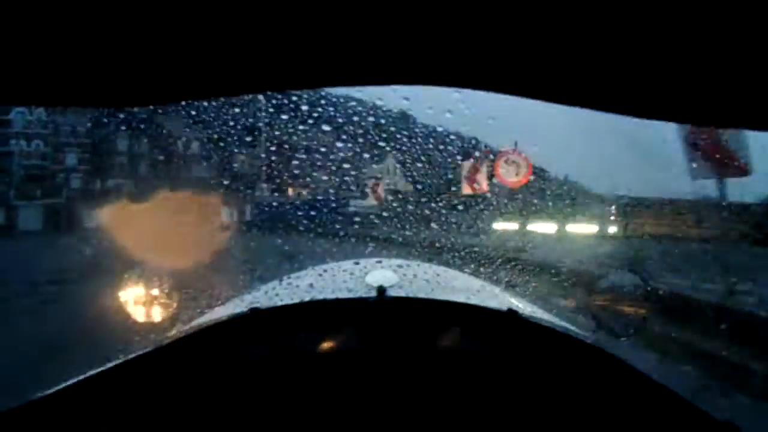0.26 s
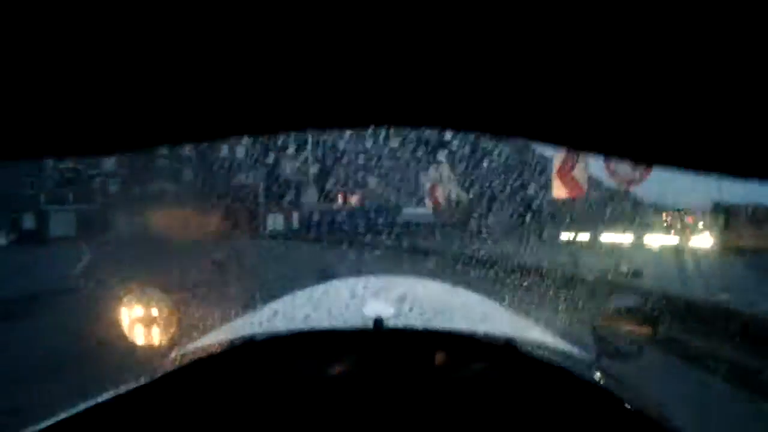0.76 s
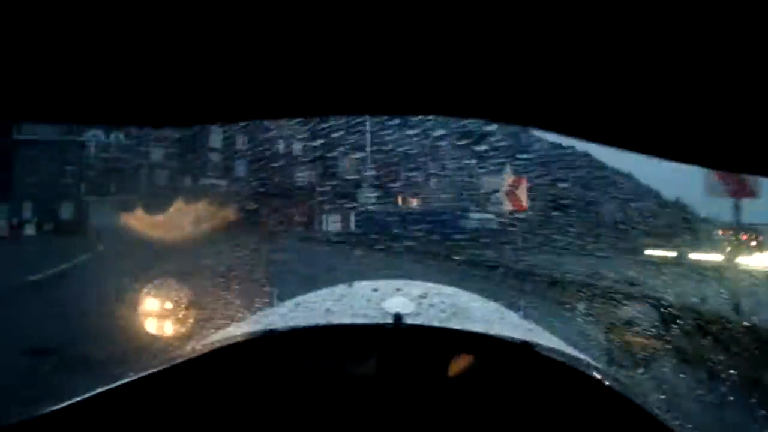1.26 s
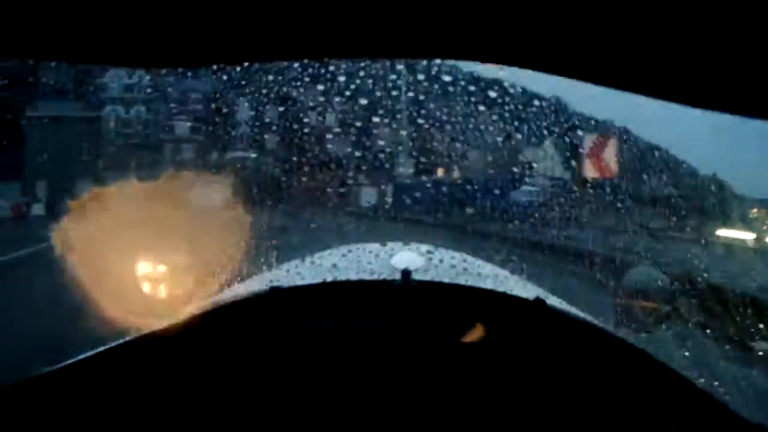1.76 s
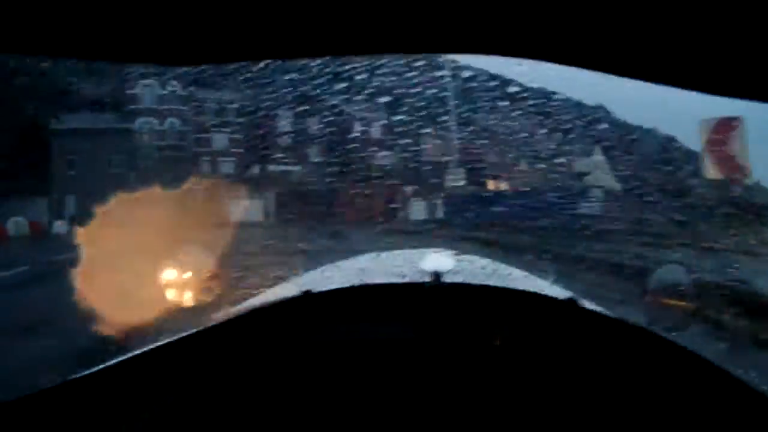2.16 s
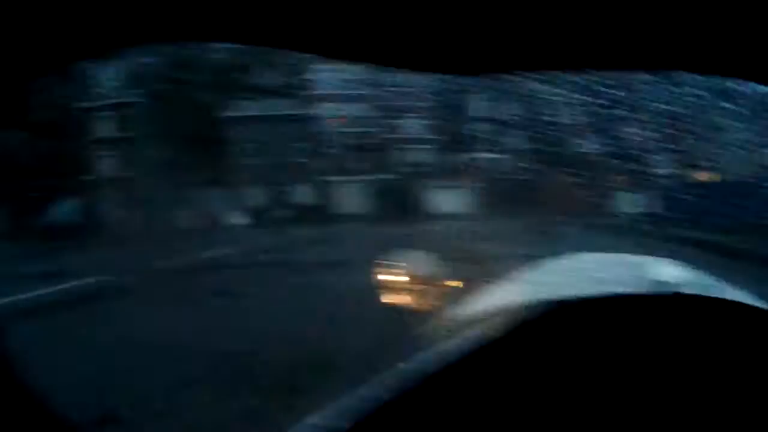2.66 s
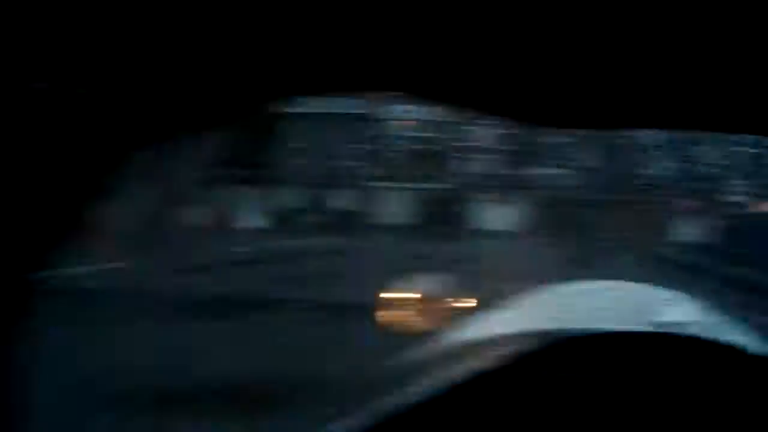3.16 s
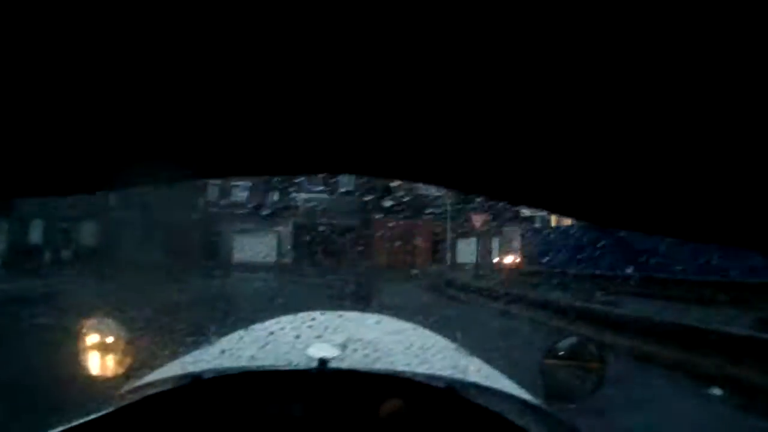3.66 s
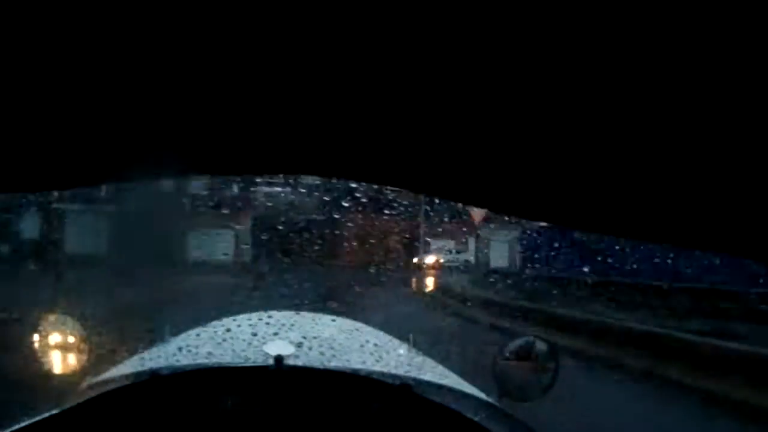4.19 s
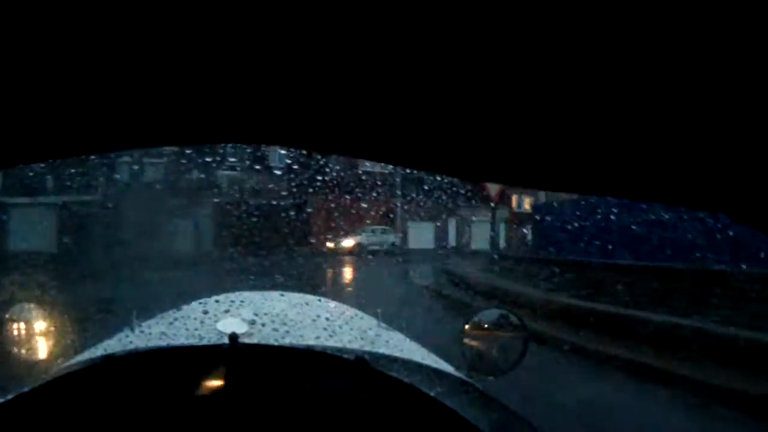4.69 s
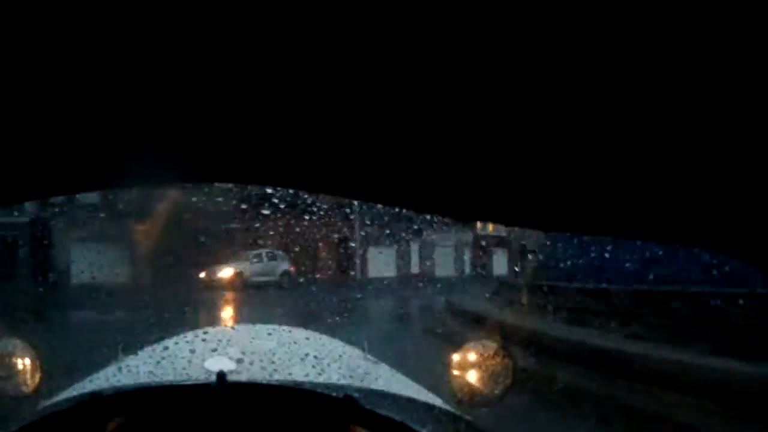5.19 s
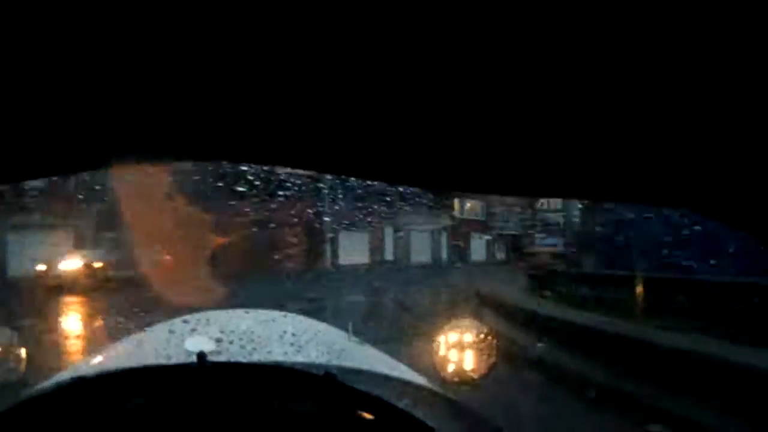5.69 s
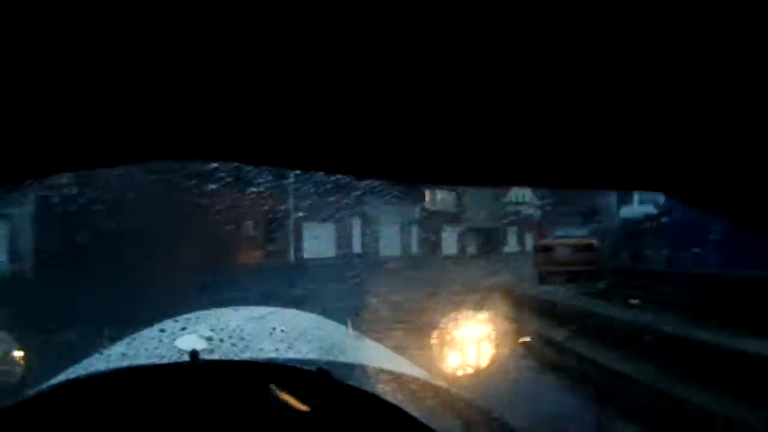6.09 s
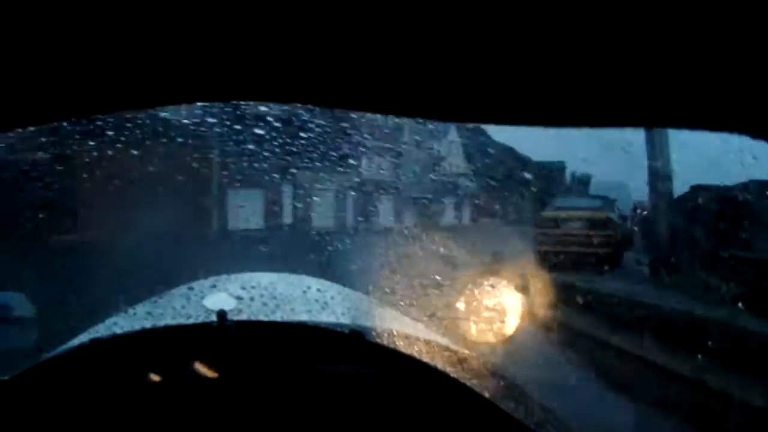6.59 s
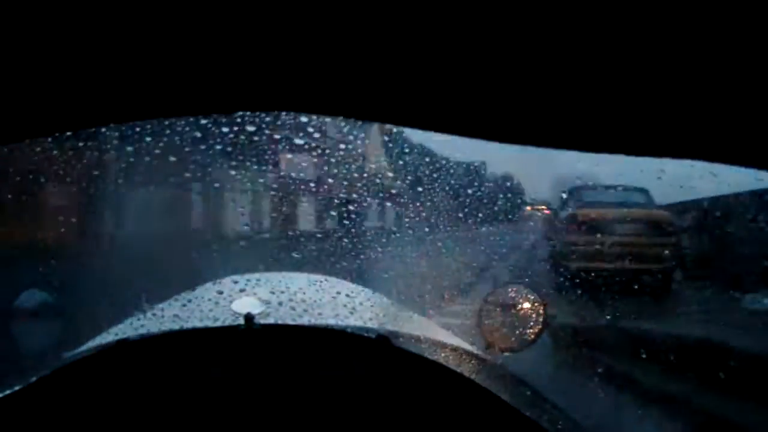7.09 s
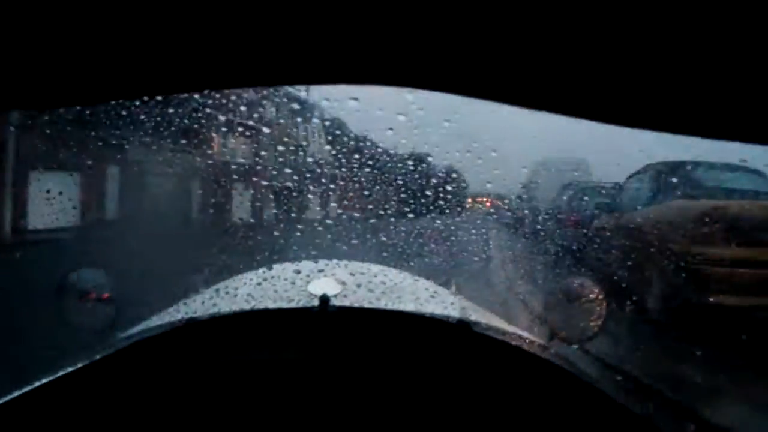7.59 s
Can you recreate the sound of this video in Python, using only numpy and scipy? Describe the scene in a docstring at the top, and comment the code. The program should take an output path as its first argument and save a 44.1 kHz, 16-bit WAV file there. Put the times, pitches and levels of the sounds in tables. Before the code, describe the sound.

Heard from within the resonant shell of a pedal vehicle on a wet road, with a close microphone. Throughout there is muffled, mid-toned tyre noise, tapping grit, very faint spray hiss and low wind buffeting. From 0 to 2 s the shell booms strongly, fittings knock, jolts crackle drily, and a puddle sloshes with a small chatter at about 0.35 s. Two hard, ringing clacks land at 1.8 and 1.95 s. After a brief dip near 2.3 s, coarser paving makes the panels roar, peaking around 2.85 s with throbbing bumps. A thump at 3.7 s and knocks, chatter and sloshing around 4 s lead to a drop in booming near 4.5 s. From 5.5 s deep thumps return; a tiny sharp snap comes at 6.0 s, and an oncoming car swishes faintly, strongest near 6.9 s, amid heavy jolts at 6.6-7 s. Rolling continues more gently to the end, near 7.85 s.

```python
"""A velomobile rolls along a wet road, heard from inside its shell.
The shell is shaped noise and low swinging tones: it booms, drums, hums and thumps with road and wind.
The tyres are smooth noise with random taps of grit, and they slosh through puddles; spray hisses faintly.
Loose fittings knock as short noise bursts, small parts chatter, and two hard clacks ring out.
Jolts make the microphone crackle, a short snap is heard, and an oncoming car swishes by as noise."""
import sys
import numpy as np
from scipy import signal
from scipy.fft import rfft, irfft, next_fast_len
from scipy.io import wavfile
from scipy.ndimage import uniform_filter1d

SR = 44100
rng = np.random.default_rng(int(sys.argv[2]) if len(sys.argv) > 2 else 0)


def generate_wav(signal):
    """Clip the signal to [-1, 1] and save it as 16-bit WAV at the path in sys.argv[1]."""
    frames = np.transpose(np.atleast_2d(signal))
    scaled = np.clip(frames, -1, 1) * 32767
    pcm = np.round(scaled).astype(np.int16)
    wavfile.write(sys.argv[1], SR, pcm)


N = 346185
TIME = np.arange(N) / SR

# How loud the lasting sounds are. Each row: time in seconds, level in dB (some get a fixed trim later).
# An oncoming car on the wet road.
CAR_LEVEL = [(0, -52), (4.5, -77), (5.5, -53), (6.2, -50.5), (6.9, -48.5), (7.4, -51.5), (7.85, -58)]
# The tyres on the wet road.
TYRE_LEVEL = [(0, -34.5), (0.25, -37.5), (0.35, -31.5), (0.55, -34), (1.0, -36), (1.3, -34.5), (2.0, -35.5),
              (2.45, -35.5), (3.0, -37.5), (3.6, -35.5), (4.05, -34.5), (4.35, -37.5), (4.6, -36.5),
              (5.4, -37), (6.1, -35.5), (6.7, -34.5), (7.2, -34), (7.85, -36)]
# The air booming in the shell.
BOOM_LEVEL = [(0, -25), (0.15, -15), (0.6, -18), (0.85, -14), (1.4, -13.5), (2.2, -13.5), (3.0, -15),
              (3.9, -16.5), (4.35, -19.5), (4.5, -32), (4.95, -21), (5.35, -26.5), (5.9, -21), (6.4, -22),
              (7.85, -22)]
# Road roughness, which sets how loudly the panels drum.
ROUGHNESS_LEVEL = [(0, -25.0), (0.55, -27), (0.7, -23), (1.0, -24), (1.9, -22), (2.28, -28.5),
                   (2.55, -22.5), (3.0, -22), (3.7, -25), (4.3, -26.5), (4.6, -29.5), (5.0, -28),
                   (5.35, -31), (6.05, -26.5), (6.4, -28), (7.0, -29.5), (7.45, -25.5), (7.85, -29)]
# The roar of the panels on a stretch of coarser paving.
ROAR_LEVEL = [(0, -53), (2.3, -35.5), (2.55, -27.5), (2.85, -24), (3.1, -30), (3.6, -33), (4.25, -44),
              (4.5, -53), (5.6, -70), (6.05, -43), (6.6, -44.5), (7.85, -48)]

# Tone colours of the sounds. Each row: frequency in Hz, relative level in dB per Hz.
CAR_COLOUR = [(600, -6), (1500, 5.5), (2500, 0.5), (3100, -2), (3700, -9), (5500, -18.5), (9000, -21)]
SPRAY_COLOUR = [(1500, 7), (4000, 7), (5500, 4.5), (8000, 4.5), (11000, 3), (13000, 4), (16000, 0)]
SNAP_COLOUR = [(1500, -6), (3000, 6), (6000, 0), (10500, 1), (13500, 0), (16000, -5)]
CRACKLE_COLOUR = [(800, 8.5), (2500, 11), (5000, 4), (9000, 1.5), (16000, -4.5)]
KNOCK_COLOUR = [(250, -8.5), (600, 1.5), (1000, 1.5), (1300, 4), (1800, -2.5), (2400, -16.5), (3300, -23),
                (4200, -36.5), (5500, -51)]
CRACK_COLOUR = [(400, -11), (1100, 12.5), (1600, 17), (2200, 11), (3800, 3), (5500, -1), (10000, -6),
                (11500, -10), (12800, -4.5), (14000, -15), (16000, -16)]
SPLASH_COLOUR = [(400, -19), (800, -8), (1050, -11), (1300, 10), (1480, -1), (1680, 5.5), (2300, -16),
                 (3300, -27), (4500, -33)]
TYRE_COLOUR = [(250, -8.5), (520, -1.6), (720, 2), (970, 2.5), (1100, 0.5), (1270, 4.5), (1500, 2),
               (1800, 0), (2100, -6.5), (2550, -17.5), (2800, -20.5), (3000, -16.5), (3700, -27),
               (6000, -36.5)]
THUD_COLOUR = [(60, 3), (130, 2.5), (220, -6.5), (450, -18.5), (700, -33)]
WIND_COLOUR = [(5, -4), (13, 1.5), (24, 5.5), (33, -4), (42, -5.5), (60, -18.5)]
BOOM_COLOUR = [(28, -16), (42, 0), (50, 0), (60, 2.5), (73, -6), (86, -7.5), (110, -19), (200, -45)]
PANEL_COLOUR = [(70, -11.5), (95, 3), (125, 6.5), (155, 1.5), (182, -4), (240, -4.5), (345, -6.5),
                (395, -12.5), (560, -16.5), (750, -25.5), (1400, -46)]
ROAR_COLOUR = [(170, -22.5), (215, 5), (240, 0), (290, 2), (340, -4), (420, -12), (540, -7), (680, -24)]

# Very short, bright snaps. Each row: start in seconds, peak in dB.
SNAPS = [(6.0148, -21.5)]
# Crackles on heavy jolts. Each row: start in seconds, strength in dB (of the summed energy).
CRACKLES = [(0.371, -17), (0.401, -18), (0.4836, -15), (0.787, -22), (0.912, -17), (1.072, -21),
            (1.09, -14), (1.2184, -20.5), (1.274, -18), (1.291, -16), (1.323, -26), (1.375, -14),
            (1.8085, -16), (1.884, -26), (2.043, -19), (2.079, -17.5), (2.088, -15.5), (2.1222, -15.5),
            (2.172, -17), (2.184, -13), (2.23, -20.5), (2.28, -21.5), (2.5139, -13.5), (2.7564, -17.5),
            (2.8343, -20.5), (2.844, -17.5), (2.9477, -28), (3.2283, -16), (3.485, -25), (3.703, -18.5),
            (3.966, -18), (5.5724, -19.5), (6.781, -17), (6.8528, -21), (6.9017, -23), (6.961, -16),
            (6.972, -18)]
# Knocks of loose fittings. Each row: start in seconds, level in dB before a fixed trim,
# brightness in dB per octave.
KNOCKS = [(0.0732, -19.5, 2.5), (0.138, -22.5, 1.5), (0.3159, -14, 4), (0.339, -21, 6), (0.3663, -17, 0),
          (0.486, -16.5, -3.5), (0.54, -18, 0), (0.852, -21.5, 4), (0.941, -22.5, 2), (1.05, -13.5, -4.5),
          (1.1646, -19.5, 2), (1.3098, -21, 5), (1.3631, -19, 4.5), (1.589, -18, -1), (1.665, -18.5, 1),
          (1.6906, -18, -1), (1.8806, -22, 0), (1.9124, -14, 2), (1.97, -15, 4), (2.051, -20.5, 0),
          (2.1696, -20.5, 0.5), (2.328, -22, 4.5), (2.599, -19, 0), (2.946, -21, 6.5), (2.988, -20, 0),
          (3.089, -20, 2), (3.274, -19.5, 2), (3.3622, -22, -3), (3.863, -19.5, 0), (3.9642, -16, 3),
          (3.997, -17.5, -1), (4.021, -13.5, 2.5), (4.029, -18, -2), (4.0946, -15.5, 1.5),
          (5.546, -21.5, 0.5), (6.045, -18, -8.5), (7.003, -25, 0)]
# Hard clacks. Each row: start in seconds, level of the ring in dB, level of the crack in dB.
CLACKS = [(1.796, -9, -17.5), (1.946, -12, -15.5)]
# Bumps set small hard parts chattering. Each row: middle in seconds, half-width in seconds, level in dB.
CHATTER_BURSTS = [(0.35, 0.033, -44.5), (4.06, 0.08, -48.5)]
# The tyres slosh through standing water. Each row: middle in seconds, half-width in seconds, level in dB.
SPLASHES = [(0.352, 0.028, -31), (0.45, 0.029, -36), (4.05, 0.023, -37), (4.17, 0.024, -34.5),
            (4.31, 0.08, -38)]
# Gusts buffet the shell. Each row: middle in seconds, level in dB.
GUSTS = [(0.449, -13), (0.85, -19), (1.25, -14), (1.72, -18), (2.1, -12), (2.53, -17), (2.98, -20),
         (3.55, -16.5), (4.08, -16.5), (4.55, -25), (4.93, -25), (5.23, -22), (5.62, -17), (5.98, -19),
         (6.38, -16), (6.84, -16.5), (7.45, -16.5)]
# Bumps make the shell throb. Each row: middle in seconds, half-width in seconds, level in dB, pitch in Hz.
BUMPS = [(1.35, 0.24, -20, 57.14), (2.2, 0.093, -13, 52.2), (2.84, 0.017, -9, 52),
         (3.02, 0.022, -10, 55.76), (3.24, 0.018, -9, 47.95), (3.75, 0.14, -16.5, 55),
         (4.32, 0.052, -18, 59.9), (5.97, 0.025, -16.5, 37.3), (6.86, 0.085, -16, 49.98),
         (7.59, 0.019, -16.5, 41)]
# Jolts make the largest panel hum. Each row: middle in seconds, half-width in seconds, level in dB.
HUMS = [(0.66, 0.058, -27), (2.63, 0.029, -19), (2.95, 0.025, -21), (3.38, 0.025, -23), (6.05, 0.042, -30),
        (6.25, 0.093, -30), (7.4, 0.095, -30)]
# Jolts thump the shell. Each row: start in seconds, peak of the swing in dB, pitch in Hz.
THUMPS = [(0.637, -15, 110), (1.052, -15, 75), (2.811, -9, 80), (3.69, -8, 45), (5.567, -9, 45),
          (5.935, -7, 36), (6.024, -14, 80), (6.045, -13, 55), (6.624, -7.5, 47.7), (6.768, -4.5, 46),
          (6.823, -6.5, 44), (6.848, -4.5, 58), (6.916, -5.5, 42), (6.957, -4, 40), (7.411, -15, 80)]

# Ring of the clacking part. Each row: frequency in Hz, level in dB, time to fall 60 dB in seconds.
CLACK_MODES = [(1210, -11, 0.072), (1603, -6, 0.035), (1846, -0.5, 0.045), (1980, -9, 0.045),
               (2570, -26, 0.025), (3000, -14, 0.062), (3140, -13, 0.037), (4520, -30, 0.025)]
# Ring of the chattering parts. Each row: frequency in Hz, level in dB, time to fall 60 dB in seconds.
CHATTER_MODES = [(1600, 11, 0.031), (2400, 0, 0.024), (3110, -6, 0.018), (3520, -5, 0.024),
                 (4120, -5, 0.017), (4720, -13, 0.018)]
# Panels struck by coarse grit. Each row: frequency in Hz, level in dB, time to fall 60 dB in seconds.
STONE_MODES = [(976, -5.5, 0.13), (1279, -2, 0.087), (1440, -5.5, 0.012), (1652, -2, 0.094),
               (1740, -7, 0.033)]
# Narrow resonances of the shell. Each row: frequency in Hz, width in Hz, level in dB.
SHELL_MODES = [(211.2, 9.6, -11), (306, 18, -30.5), (350, 22, -20.5)]

GUST_S, BREEZE_DB = 0.11, -26.5   # half-width of a gust; the wind between gusts
SPRAY_DB, SPRAY_FOLLOWS = -58.5, 0.14   # average level; dB gained per dB of the tyres
GRIT_DB, GRIT_FOLLOWS = -2.5, 0.59   # average against the smooth tyre noise; dB gained per dB of roughness
STONES_PER_S, STONE_DB = 28, -7   # coarse grit; level against the fine grit
SURGE_DB, SURGE_HZ = 0.8, 11.3   # patches of water make the tyres surge: spread; fastest main rate
DIP_AT_S, DIP_S, DIP_DB = 2.297, 0.029, -7.5   # the hiss and tyres dip briefly: middle, half-width, depth
RATTLES_PER_S, RATTLE_DB = 3.7, -25.5   # lighter knocks at random; level before the knocks' trim
TICKS_PER_S, TICK_DB = 1.2, -28   # faint crackles at random
CHATTERS_PER_S, SPLASH_DROPS_PER_S = 200, 300
SNAP_T60_S, THUMP_T60_S = 0.0039, 0.1   # time to fall 60 dB
THUD_DB = -16   # the panels' thud against the swing of the air
CUTOFF_HZ = 15900


def from_db(db):
    """Decibels to gain."""
    return 10 ** (np.asarray(db) / 20)


def rms_one(x):
    """Scale to unit power."""
    return x / np.sqrt(np.mean(x ** 2) + 1e-20)


def level_curve(rows):
    """Level in dB at every sample, in straight lines between the rows."""
    seconds, db = np.transpose(rows)
    return np.interp(TIME, seconds, db)


def swell(s, half_width_s):
    """Bell-shaped rise and fall around time s."""
    return np.exp(-0.5 * ((TIME - s) / half_width_s) ** 2)


def swells(rows):
    """Gain of several swells added together."""
    return sum(from_db(db) * swell(s, width) for s, width, db in rows)


def dying(t60, size=8192):
    """Envelope that falls 60 dB in t60 seconds."""
    return np.exp(-np.log(1000) * TIME[:size] / t60)


def coloured(x, spectrum):
    """Filter that only looks back in time (minimum phase), falling 20 dB per octave past its last point."""
    size = 2 * next_fast_len(len(x))
    hz, db = np.transpose(spectrum)
    octave = np.log2(np.maximum(np.fft.rfftfreq(size, 1 / SR), 1))
    gain_db = np.interp(octave, np.log2(hz), db) - 20 * np.maximum(octave - np.log2(hz[-1]), 0)
    # folding the cepstrum gives the phase that belongs to this gain
    cepstrum = irfft(np.log(from_db(gain_db)))
    cepstrum[1:size // 2] *= 2
    cepstrum[size // 2 + 1:] = 0
    return irfft(rfft(x, size) * np.exp(rfft(cepstrum)))[:len(x)]


def noise(spectrum):
    """Coloured noise of unit power."""
    return rms_one(coloured(rng.standard_normal(N), spectrum))


def evened(x, seconds):
    """Hold the power near one, averaged over about the given length."""
    size = max(int(seconds * SR), 2)
    power = uniform_filter1d(uniform_filter1d(x ** 2, size), size)
    return x / np.sqrt(power + 1e-12)


def resonate(x, hz, width_hz):
    """One two-pole resonance."""
    r = np.exp(-np.pi * width_hz / SR)
    return signal.lfilter([1, 0, -1], [1, -2 * r * np.cos(2 * np.pi * hz / SR), r * r], x)


def add(out, s, sound):
    """Mix a sound in at time s."""
    start = int(s * SR)
    out[start:start + len(sound)] += sound[:N - start]


def at_random(per_s, db, drive_db):
    """Rows (seconds, dB) of chance events whose rate follows the power of a drive."""
    drive = from_db(drive_db) ** 2
    happens = rng.random(N) < per_s / SR * drive / drive.mean()
    return [(s, db) for s in TIME[happens]]


def random_taps(per_s, spread_db):
    """Single-sample taps at random times, with strengths of random size."""
    sizes = from_db(spread_db * np.minimum(rng.exponential(1, N), 2))
    return sizes * (rng.random(N) < per_s / SR)


def hit(fade, spectrum):
    """A dense scatter of contacts under an envelope, coloured; unit power over its first 10 ms."""
    sound = coloured(rng.choice([-1, 1], len(fade)) * fade, spectrum)
    return sound / np.sqrt(np.mean(sound[:SR // 100] ** 2))


def patter(per_s, modes, spread_db):
    """Random taps, each striking every mode with a strength of its own; unit power."""
    taps = random_taps(per_s, spread_db)
    out = np.zeros(N)
    for hz, db, t60 in modes:
        strikes = taps * rng.standard_normal(N) + 1e-18
        width_hz = np.log(1000) / (np.pi * t60)
        out += from_db(db) * resonate(strikes, hz, width_hz)
    return rms_one(out)


def passing_car():
    """A car swishes by: coloured noise that follows a level curve."""
    return from_db(level_curve(CAR_LEVEL)) * noise(CAR_COLOUR)


def spray(tyre_db):
    """Fine spray hisses as noise, a little louder when the tyres are louder."""
    spray_db = SPRAY_DB + SPRAY_FOLLOWS * (tyre_db - tyre_db.mean())
    return from_db(spray_db) * noise(SPRAY_COLOUR)


def snaps():
    """A thin burst of noise that is over in a millisecond or two."""
    out = np.zeros(N)
    for s, db in SNAPS:
        snap = hit(dying(SNAP_T60_S), SNAP_COLOUR)
        add(out, s, from_db(db) * snap / np.abs(snap).max())
    return out


def crackles(boom_db, spread_s=0.003, count=5):
    """Handfuls of dry, thin ticks; faint extra ones come more often while the shell booms."""
    out = np.zeros(N)
    for s, db in CRACKLES + at_random(TICKS_PER_S, TICK_DB, boom_db):
        ticks = np.zeros(1024)
        at = (rng.random(count) * spread_s * SR).astype(int)
        ticks[at] = rng.choice([-1, 1], count) * rng.uniform(0.2, 1, count)
        crackle = coloured(ticks, CRACKLE_COLOUR)
        add(out, s, from_db(db) * crackle / np.sqrt(np.sum(crackle ** 2)))
    return out


def chatter():
    """After a bump small hard parts tick against each other in a dense cluster."""
    ticking = patter(CHATTERS_PER_S, CHATTER_MODES, spread_db=2.5)
    return swells(CHATTER_BURSTS) * evened(ticking, seconds=0.06)


def knocks(rough_db, contact=5.5):
    """Fittings hit the shell: a hard contact, then a weaker rattle; light ones favour rough road."""
    out = np.zeros(N)
    fade = dying(t60=0.024) + from_db(-19) * dying(t60=0.12)
    fade[0] = contact   # the first sample stands out as the contact itself
    light = [(s, db, 0) for s, db in at_random(RATTLES_PER_S, RATTLE_DB, rough_db)]
    lowest_hz = KNOCK_COLOUR[0][0]
    for s, db, tilt in KNOCKS + light:
        colour = [(hz, level + tilt * np.log2(hz / lowest_hz)) for hz, level in KNOCK_COLOUR]
        add(out, s, from_db(db - 10.5) * hit(fade, colour))   # 10.5 dB is the fixed trim
    return out


def clacks(seat_s=0.00126, bite_s=0.0009, bounce_s=0.0047, bounce_db=-7):
    """A hard part strikes and rings, bites into its seat with a bright crack and bounces once."""
    out = np.zeros(N)
    crack = dying(t60=0.018) + from_db(-13.5) * dying(t60=0.07)
    crack = crack * (1 - np.exp(-TIME[:len(crack)] / bite_s))
    for s, ring_db, crack_db in CLACKS:
        for k, (hz, db, t60) in enumerate(CLACK_MODES):
            fade = dying(t60)
            # neighbouring modes start in opposite directions
            ring = (-1) ** k * fade * np.sin(2 * np.pi * hz * TIME[:len(fade)])
            bounce_at = s + bounce_s * rng.uniform(0.927, 1.02)
            add(out, s, from_db(ring_db + db) * ring)
            add(out, bounce_at, from_db(ring_db + db + bounce_db) * ring)
        add(out, s + seat_s, from_db(crack_db) * hit(crack, CRACK_COLOUR))
    return out


def splashes():
    """Dense drops thrown against the wheel wells: random clicks, coloured."""
    drops = rng.standard_normal(N) * (rng.random(N) < SPLASH_DROPS_PER_S / SR)
    return swells(SPLASHES) * evened(coloured(drops, SPLASH_COLOUR), seconds=0.042)


def fine_grit(grains_per_s=130, spread_db=3.5, ring_s=0.018):
    """Grains tap the shell, each scattering through it for a few milliseconds; unit power."""
    taps = random_taps(grains_per_s, spread_db)
    power = signal.fftconvolve(taps ** 2, dying(ring_s) ** 2)[:N]
    scatter = np.sqrt(np.abs(power))
    return rms_one(coloured(scatter * rng.standard_normal(N), TYRE_COLOUR))


def coarse_grit():
    """Stones flung at the shell make its panels ring."""
    taps = patter(STONES_PER_S, STONE_MODES, spread_db=-0.5)
    return from_db(STONE_DB) * evened(taps, seconds=0.95)


def tyres(tyre_db, rough_db):
    """Smooth wet rolling noise that surges, plus grit that grows with the roughness of the road."""
    surge_db = SURGE_DB * noise([(1, 0), (SURGE_HZ, 0)])
    grit_db = GRIT_DB + GRIT_FOLLOWS * (rough_db - rough_db.mean())
    rolling = noise(TYRE_COLOUR) + from_db(grit_db) * (fine_grit() + coarse_grit())
    return from_db(tyre_db + surge_db - 2.0) * rolling   # 2 dB is a fixed trim


def wind():
    """Gusts over a steady breeze buffet the shell as very low noise."""
    gust_power = sum((from_db(db) * swell(s, GUST_S)) ** 2 for s, db in GUSTS)
    level = np.sqrt(from_db(BREEZE_DB) ** 2 + gust_power)
    return level * evened(noise(WIND_COLOUR), seconds=0.16)


def throbs(rows, wander=0.7, wander_hz=9):
    """Low resonances that swell and fade, their phase wandering a little."""
    drift = wander * noise([(1, 0), (wander_hz, 0)])
    out = np.zeros(N)
    for s, width, db, hz in rows:
        tone = np.sqrt(2) * np.sin(2 * np.pi * (hz * TIME + rng.random()) + drift)
        out += from_db(db) * swell(s, width) * tone
    return out


def hums():
    """The largest panel hums at its lowest resonance."""
    lowest_hz = SHELL_MODES[0][0]
    return throbs([(s, width, db, lowest_hz) for s, width, db in HUMS])


def thumps():
    """A jolt kicks the air in the shell into a low, quickly dying swing; the panels add a dull thud."""
    out = np.zeros(N)
    fade = dying(THUMP_T60_S)
    for s, db, hz in THUMPS:
        swing = rng.choice([-1, 1]) * fade * np.sin(2 * np.pi * hz * TIME[:len(fade)])
        thud = from_db(THUD_DB) * hit(dying(t60=0.057), THUD_COLOUR)
        add(out, s, from_db(db) * (swing / np.abs(swing).max() + thud))
    return out


def shell(boom_db, rough_db):
    """The air inside booms; the panels drum and roar, with a few narrow resonances."""
    boom = from_db(boom_db - 0.93) * evened(noise(BOOM_COLOUR), seconds=0.15)   # fixed trim
    shaking = noise([(100, 0), (400, 0.0065)])
    modes = sum(from_db(db) * rms_one(resonate(shaking, hz, width)) for hz, width, db in SHELL_MODES)
    drumming = evened(noise(PANEL_COLOUR) + modes, seconds=0.19)
    panels = from_db(rough_db + 2.0) * drumming   # fixed trim
    roar = from_db(level_curve(ROAR_LEVEL)) * noise(ROAR_COLOUR)
    return boom + panels + roar


def scene():
    """Add up everything that is heard inside the shell."""
    rough_db = level_curve(ROUGHNESS_LEVEL)
    tyre_db = level_curve(TYRE_LEVEL)
    boom_db = level_curve(BOOM_LEVEL)
    wet_road = passing_car() + spray(tyre_db) + splashes() + tyres(tyre_db, rough_db)
    dip = from_db(DIP_DB * swell(DIP_AT_S, DIP_S))
    small_parts = snaps() + crackles(boom_db) + chatter() + knocks(rough_db) + clacks()
    body = wind() + throbs(BUMPS) + hums() + thumps() + shell(boom_db, rough_db)
    return (dip * wet_road + small_parts + body)[None]


def record(dry, ceiling=0.77):
    """The highest peaks are rounded off and the top of the treble is cut."""
    rounded = dry / (1 + (dry / ceiling) ** 8) ** (1 / 8)
    low_pass = signal.ellip(10, 0.1, 80, CUTOFF_HZ, fs=SR, output="sos")
    return signal.sosfilt(low_pass, rounded)


dry = scene()
out = record(dry)
generate_wav(out)
```